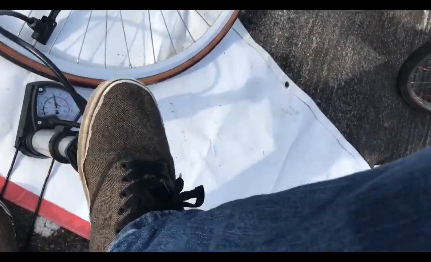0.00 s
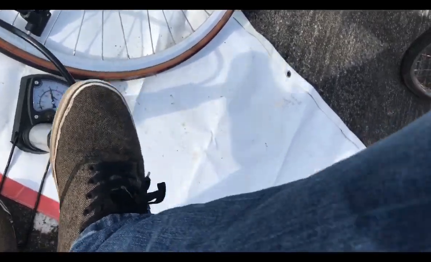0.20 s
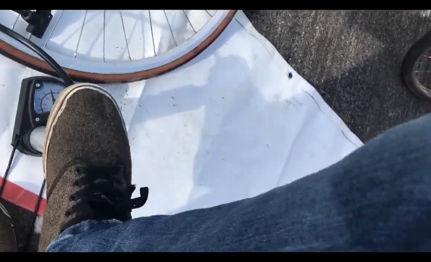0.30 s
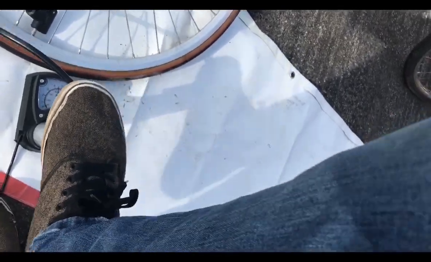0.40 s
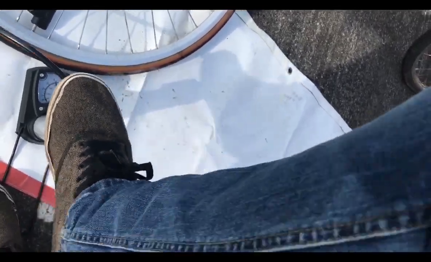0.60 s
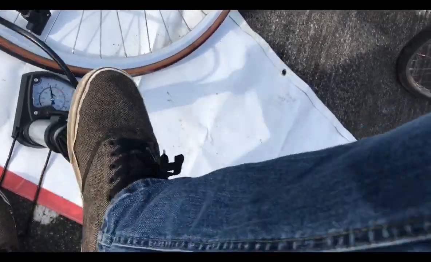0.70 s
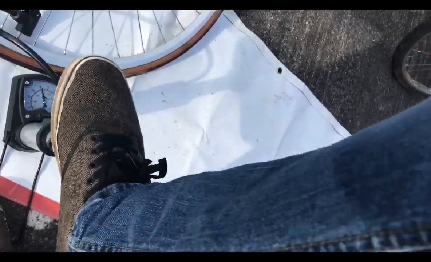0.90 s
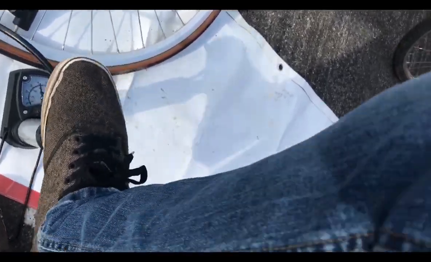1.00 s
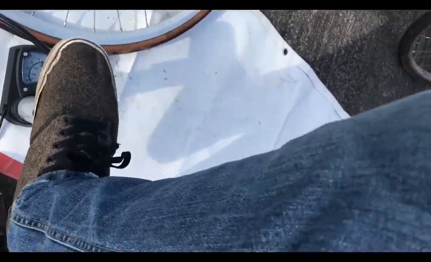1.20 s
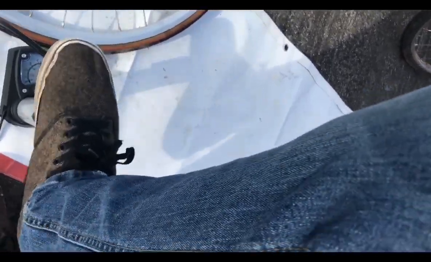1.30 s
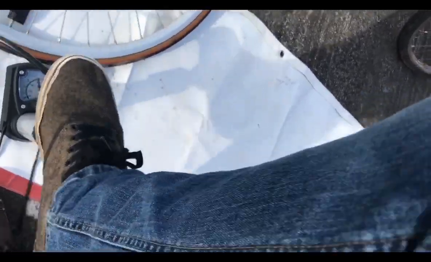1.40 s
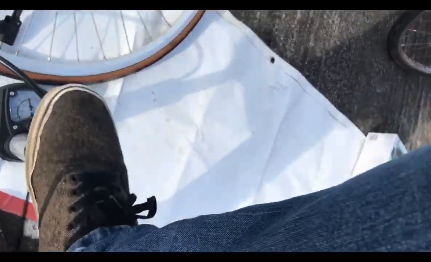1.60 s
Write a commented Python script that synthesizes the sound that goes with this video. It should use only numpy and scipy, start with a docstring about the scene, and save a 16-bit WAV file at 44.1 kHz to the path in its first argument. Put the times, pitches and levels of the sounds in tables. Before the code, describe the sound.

A foot-operated pump, close and dry outdoors, makes two strokes in about 1.7 seconds. Metal ticks and small knocks from 0.08 lead to a squeak and plastic knock at 0.36; a release knock at 0.54, soft thump, and air hiss peaking at 0.66. Ticks resume at 0.84, squeak at 1.08, loudest knock at 1.13, release at 1.33, hiss at 1.42, then faint ticks. Rubbing, wind rumble and quiet street continue underneath.

```python
"""Wind rumble and a quiet street are heard first, with faint air hiss and rubbing, as a foot pump is trodden twice.
Each stroke brings linkage ticks, a seal squeak, a knock at the bottom, a knock and thump on release, then air
hissing into the barrel. Knocks sum decaying body modes; ticks are noise bursts through linkage resonances;
thumps are short swelling sines; squeaks are wandering harmonic tones; hiss, rubbing, wind and street are
coloured noise, all but the street following a level curve in time."""
import sys
import numpy as np
from scipy import signal
from scipy.fft import rfft, irfft
from scipy.io import wavfile
from scipy.ndimage import uniform_filter1d

SR = 44100
rng = np.random.default_rng(int(sys.argv[2]) if len(sys.argv) > 2 else 0)


def generate_wav(signal):
    """Clip the signal to [-1, 1] and save it as 16-bit WAV at the path in sys.argv[1]."""
    frames = np.transpose(np.atleast_2d(signal))
    scaled = np.clip(frames, -1, 1) * 32767
    pcm = np.round(scaled).astype(np.int16)
    wavfile.write(sys.argv[1], SR, pcm)


def convert_level_to_amplitude(level_db):
    """Map a level in decibels to its linear amplitude factor."""
    exponent = np.asarray(level_db, float) / 20
    return 10 ** exponent


N = 74970  # samples, 1.7 s

# wind rumble on the microphone: time_s, level_db
WIND_LEVEL = [(0, -49.5), (.12, -60), (.26, -44.5), (.32, -53.5), (.43, -45.5), (.51, -53.5), (.67, -46.5),
              (.75, -63), (.82, -43.5), (.9, -46.5), (1.06, -59.5), (1.15, -43), (1.22, -56), (1.33, -47.5),
              (1.4, -46), (1.51, -55), (1.6, -53), (1.66, -47.5), (1.7, -46)]
# spectrum of the wind: frequency_hz, relative_density_db
WIND_SPECTRUM = [(15, -27), (25, -8), (45, -4), (65, 1), (100, -6.5), (160, -16.5), (300, -32.5),
                 (600, -75)]
# spectrum of the street: frequency_hz, relative_density_db
STREET_SPECTRUM = [(80, -23), (150, -8), (260, 1), (480, -16.5), (900, -3.5), (1600, -14), (3000, -26.5),
                   (6000, -32.5), (15800, -33)]
STREET_DB = -58.5
# air hiss at the valve: time_s, high_band_level_db, low_band_level_db
HISS_LEVEL = [(0, -65, -60), (.07, -71, -83), (.09, -60, -60.5), (.125, -54, -51), (.18, -67, -71.5),
              (.22, -63, -56), (.29, -63.5, -61.5), (.36, -49.5, -50), (.385, -60, -61), (.42, -77, -75.5),
              (.52, -64.5, -61.5), (.57, -58.5, -57), (.577, -55, -56), (.597, -56, -60), (.604, -62, -57),
              (.615, -54.5, -53), (.66, -41, -47), (.69, -46.5, -53), (.76, -71.5, -65.5), (.83, -73, -69),
              (.85, -56.5, -54.5), (.95, -60.5, -62), (1.01, -62.5, -59), (1.12, -54.5, -53),
              (1.15, -71, -66.5), (1.2, -71.5, -69.5), (1.24, -62.5, -66.5), (1.29, -70, -65),
              (1.35, -59, -59.5), (1.385, -53, -55), (1.415, -41.5, -49.5), (1.46, -47, -51),
              (1.495, -59, -60), (1.54, -83, -74), (1.59, -71, -66), (1.64, -55.5, -57.5),
              (1.7, -67, -61.5)]
# spectrum of the high hiss band: frequency_hz, relative_density_db
HISS_HIGH_SPECTRUM = [(6000, -43), (8200, -1.5), (10300, -4), (12000, 1.5), (14000, -1.5), (15400, 0.5),
                      (15850, -20)]
# spectrum of the low hiss band: frequency_hz, relative_density_db
HISS_LOW_SPECTRUM = [(1200, 0), (2000, 0), (3500, 0), (5000, -3.5), (6300, 0), (7500, -3), (9000, -21),
                     (12000, -68)]
HISS_PATCH_DB, HISS_PATCH_HZ = 2, 70.54  # spread and rate of each band's own swelling
# rubbing of shoe, cloth and piston: time_s, level_db
RUB_LEVEL = [(0, -59.5), (.07, -56.5), (.1, -50), (.2, -55), (.27, -55), (.33, -56), (.38, -50.5),
             (.42, -58), (.52, -59.5), (.56, -47.5), (.64, -52), (.76, -61.5), (.82, -66), (.85, -55.5),
             (.97, -52), (1.02, -59), (1.11, -47), (1.16, -46), (1.23, -57), (1.32, -60.5), (1.35, -49),
             (1.41, -52.5), (1.5, -59), (1.6, -55), (1.63, -46.5), (1.7, -60)]
# spectrum of the rubbing: frequency_hz, relative_density_db
RUB_SPECTRUM = [(150, 3), (300, -1), (500, -6.5), (850, -1.5), (1100, -5), (1500, -10.5), (2500, -17),
                (4000, -27.5), (8000, -68)]
RUB_GRAINS_PER_S, RUB_GRAIN_DB = 260, 3.5
# modes of the plastic pump body: frequency_hz, level_db, t60_s (before the ring factor of each knock)
BODY_MODES = [(339, 2, 0.025), (432, 1, 0.024), (513, 8, 0.016), (634, 4, 0.022), (798, 7, 0.019),
              (1032, 6, 0.011), (1072, 2, 0.017), (1302, -0.5, 0.02), (1646, -1.5, 0.019),
              (1970, -2.5, 0.033), (2320, 1.5, 0.015)]
# knocks on the body: start_s, peak_db (before the low cut), struck_pitch_hz, spread_octaves, ring_factor
KNOCK_EVENTS = [(.078, -30.5, 380, 1.36, 0.69), (0.1313, -34, 760, 0.45, 0.67),
                (.172, -30.5, 910, 0.87, 0.66), (0.2282, -23.5, 980, 0.98, .7), (.295, -46, 780, .5, 0.78),
                (0.3646, -21, 695, 0.9, 1.7), (.368, -17.5, 1065, 0.51, 1.43),
                (0.5432, -20, 1070, 0.92, 1.2), (0.616, -35, 1010, 0.26, 1.9),
                (.835, -34.5, 735, 1.22, 0.39), (.906, -41, 557, 0.63, 0.64),
                (0.969, -28.5, 676, 0.26, 0.71), (1.107, -25.5, 714, 1.7, 1.3),
                (1.1285, -12.5, 1140, 0.42, 1.1), (1.1298, -11.5, 432, 0.71, 0.49),
                (1.326, -16.5, 980, 0.9, 1.38), (1.394, -35, 930, 0.77, 1), (1.572, -43.5, 1520, 1.8, 0.45),
                (1.613, -38.5, 1100, 1.6, 0.87), (1.624, -35.5, 694, 0.5, 1.03),
                (1.652, -42.5, 850, 0.45, 1.6)]
KNOCK_RISE_S = 0.0018
KNOCK_LOW_CUT_HZ = 220  # removes the slow offset of the summed modes
# resonances of the metal linkage: frequency_hz, width_hz, level_db
LINKAGE_MODES = [(2450, 410, 4.5), (3280, 410, 4), (3940, 1480, 2.5), (4890, 1760, 3), (6300, 1580, -1),
                 (7700, 1200, -20), (8980, 2100, -4.5), (12250, 1600, -4), (15070, 740, 2)]
# ticks and clacks of the linkage: start_s, peak_db, rattle_t60_s, brightest_hz, fall_off_db_per_octave
TICK_EVENTS = [(.079, -34.5, 0.032, 3100, 20), (0.085, -42.5, 0.014, 3330, 19),
               (0.099, -38, 0.013, 2450, 21), (0.158, -37, 0.018, 11000, 3), (.171, -33, 0.048, 6000, 2.5),
               (0.1917, -31, 0.047, 6570, 4), (.2045, -29, 0.026, 7000, 8), (0.216, -33, 0.029, 7000, 4),
               (0.2281, -19.5, 0.025, 4240, 6), (0.365, -27.5, 0.033, 3100, 2),
               (0.5442, -27, 0.041, 2450, 6.5), (0.6139, -36.5, 0.013, 3830, 19),
               (.654, -33.5, 0.0058, 2500, 18), (0.781, -47.5, 0.013, 6900, 11),
               (0.833, -48.5, 0.033, 4500, 8), (0.836, -28.5, 0.028, 3220, 13.5),
               (0.9056, -34.5, 0.014, 8000, 3), (0.932, -34.5, 0.021, 6900, 15),
               (.9398, -40, 0.01, 7000, 10), (0.9507, -23.5, 0.032, 13000, 3), (1.106, -33, 0.028, 3000, 4),
               (1.1291, -22, 0.02, 2880, 2.5), (1.3276, -31.5, 0.027, 2850, 2.5),
               (1.394, -33, 0.01, 3000, -1), (1.530, -41.5, 0.029, 2980, 2),
               (1.572, -46.5, 0.019, 3400, 10), (1.613, -44, 0.018, 2900, 20),
               (1.687, -36, 0.0095, 6300, 7)]
SNAP_T60_S, RATTLE_DB = .008, -7  # first snap of a tick; rattle level relative to it
BELOW_STEEPER = 2.0  # factor on the fall-off under the brightest frequency
# soft thumps of the sole and frame: start_s, peak_db, frequency_hz, length_cycles
THUMP_EVENTS = [(.5985, -31, 108, 1.7), (0.56, -45, 46, 1.8), (.865, -31.5, 58, 1.6),
                (1.373, -26, 141, 1.38), (0.12, -51, 53, 1.5), (1.136, -41, 250, 0.52),
                (0.362, -37, 235, 3.5)]
# squeaks of the piston seal, one list each: time_s, pitch_hz, level_db
SQUEAK_TRACKS = [
    [(0.29, 812, -63), (0.297, 815.5, -55), (0.334, 934, -49), (0.346, 881, -34.5), (0.354, 879, -32),
     (0.372, 890, -38)],
    [(1.056, 860, -45), (1.068, 881, -47.5), (1.08, 860, -28), (1.104, 875, -36.5), (1.122, 930, -37.5),
     (1.128, 920, -48)],
]
# overtones of the squeak: frequency_multiple, level_db
SQUEAK_HARMONICS = [(1, 0), (2, -17), (3, -32), (4, -30)]
SQUEAK_FLUTTER_DB, SQUEAK_FLUTTER_HZ, SQUEAK_GRIT_DB = 1.8, 220, -15
SQUEAK_STEADY_DB = -42  # below this level the slip grows irregular
SQUEAK_WANDER = .07  # relative pitch spread at full irregularity
TOP_HZ, TOP_DROP_DB = 15800, 20


def curve(rows, col=1):
    """Linear interpolation: a table column joined by straight lines in time."""
    rows = np.array(rows)
    return np.interp(np.arange(N) / SR, rows[:, 0], rows[:, col])


def noise(colour):
    """Spectral shaping: white noise weighted by a (Hz, dB) density and scaled to unit rms."""
    hz, db = np.array(colour, float).T
    f = np.maximum(np.arange(N // 2 + 1) * SR / N, 1)
    gain = convert_level_to_amplitude(np.interp(np.log(f), np.log(hz), db, left=-60, right=-90))
    x = irfft(rfft(rng.standard_normal(N)) * gain, N)
    return x / x.std()


def walk(rate_hz):
    """Smoothed random modulation: levels held for 1 / rate and slewed twice, with unit spread."""
    k = int(SR / rate_hz)
    held = np.repeat(rng.standard_normal(N // k + 1), k)
    x = uniform_filter1d(uniform_filter1d(held, k), k)[:N]
    return x / x.std()


def fade(t, t60):
    """Exponential damping: a decay by 60 dB in t60 seconds."""
    return np.exp(-np.log(1000) * t / t60)


def add(out, start_s, sound, peak_db):
    """Superposition: a sound is normalised to its peak level and summed in at its start."""
    i = int(start_s * SR)
    n = min(len(sound), N - i)
    out[i:i + n] += sound[:n] * convert_level_to_amplitude(peak_db) / np.abs(sound).max()


def wind():
    """Turbulent pressure on a microphone: low noise whose level follows gusts and a slow random walk."""
    return noise(WIND_SPECTRUM) * convert_level_to_amplitude(curve(WIND_LEVEL) + 0.84 * walk(19.5))


def street():
    """Stationary background: coloured noise at a steady level."""
    return noise(STREET_SPECTRUM) * convert_level_to_amplitude(STREET_DB)


def patchy(x, count=14):
    """Independent band modulation: overlapping bands of a sound swell and sink each on their own."""
    spec, out = rfft(x), 0
    place = np.sqrt(np.arange(len(spec)) / len(spec)) * count  # bands widen with frequency
    for k in range(count + 1):
        band = irfft(spec * np.clip(1 - np.abs(place - k), 0, 1), N)
        out = out + band * convert_level_to_amplitude(HISS_PATCH_DB * walk(HISS_PATCH_HZ))
    return out


def hiss():
    """Jet noise: air through a narrow gap, two noise bands sharing one sputter, made patchy."""
    sputter_db = 0.55 * walk(60.4) + 1.54 * walk(430)
    high = noise(HISS_HIGH_SPECTRUM) * convert_level_to_amplitude(curve(HISS_LEVEL) + sputter_db)
    low = noise(HISS_LOW_SPECTRUM) * convert_level_to_amplitude(curve(HISS_LEVEL, col=2) + sputter_db)
    return patchy(high + low)


def rub():
    """Sliding friction: mid-range noise made grainy by rapid random level changes."""
    return noise(RUB_SPECTRUM) * convert_level_to_amplitude(curve(RUB_LEVEL) + RUB_GRAIN_DB * walk(RUB_GRAINS_PER_S))


def knocks():
    """Modal excitation: each blow rings most the body modes near its struck pitch."""
    out, t = np.zeros(N), np.arange(4096) / SR
    hz, db, t60 = np.array(BODY_MODES).T[:, :, None]
    for start_s, peak_db, struck_hz, spread, ring_factor in KNOCK_EVENTS:
        phase = rng.uniform(-.6, .6, (len(BODY_MODES), 1))
        share = np.exp(-(np.log2(hz / struck_hz) / max(spread, .2)) ** 2)
        modes = convert_level_to_amplitude(db) * share * np.sin(2 * np.pi * hz * t + phase) * fade(t, t60 * ring_factor)
        rise = 1 - np.exp(-(t / KNOCK_RISE_S) ** 2)
        add(out, start_s, modes.sum(axis=0) * rise, peak_db)
    low_cut = signal.butter(2, KNOCK_LOW_CUT_HZ, "high", fs=SR, output="sos")
    return signal.sosfilt(low_cut, out)


def ticks():
    """Resonant filtering: a dry snap and a short rattle of noise excite the linkage resonances."""
    out, t = np.zeros(N), np.arange(2048) / SR
    f = np.maximum(np.arange(2049) * SR / 4096, 1)
    ring = 0
    for k, (hz, width, db) in enumerate(LINKAGE_MODES):
        resonance = 1j * f * width / (hz ** 2 - f ** 2 + 1j * f * width)
        ring = ring + convert_level_to_amplitude(db) * resonance * (-1) ** k  # neighbours alternate in sign
    for start_s, peak_db, t60, brightest_hz, slope_db in TICK_EVENTS:
        rise = 1 - np.exp(-t / 0.00019)
        shape = (fade(t, SNAP_T60_S) + convert_level_to_amplitude(RATTLE_DB) * fade(t, max(t60, .003))) * rise
        octaves = np.log2(f / brightest_hz)
        distance = np.where(octaves < 0, -BELOW_STEEPER * octaves, octaves)
        tilt = convert_level_to_amplitude(-max(slope_db, 0) * distance)  # a negative slope counts as flat
        burst = rng.standard_normal(len(t)) * shape
        add(out, start_s, irfft(rfft(burst, 4096) * ring * tilt)[:len(t)], peak_db)
    return out


def thumps():
    """Heavily damped oscillation: a push and rebound, a low sine that swells and dies within a few cycles."""
    out = np.zeros(N)
    for start_s, peak_db, hz, cycles in THUMP_EVENTS:
        turn = np.arange(int(4 * cycles / hz * SR)) / SR * hz
        swell = turn * np.exp(-3.5 * turn / cycles)
        add(out, start_s, np.sin(2 * np.pi * turn) * swell, peak_db)
    return out


def squeaks():
    """Stick-slip of the seal: pitch wanders while faint and steadies when loud, under fluttering harmonics."""
    out, t = 0, np.arange(N) / SR
    for rows in SQUEAK_TRACKS:
        level_db = curve(rows, col=2)
        loose = np.clip((SQUEAK_STEADY_DB - level_db) / 8, .1, 1)  # irregularity of the slip
        pitch_hz = curve(rows) * (1 + SQUEAK_WANDER * loose * walk(250))
        phase = 2 * np.pi * np.cumsum(pitch_hz) / SR
        gate = np.clip(np.minimum(t - rows[0][0], rows[-1][0] - t) / 0.00065, 0, 1)
        tone = 0
        for k, db in SQUEAK_HARMONICS:
            flutter_db = (k + 2 * loose) * SQUEAK_FLUTTER_DB * walk(SQUEAK_FLUTTER_HZ)
            tone = tone + convert_level_to_amplitude(db + flutter_db) * np.sin(k * phase)
        grit = 1 + convert_level_to_amplitude(SQUEAK_GRIT_DB) * walk(900)
        out = out + np.sqrt(2) * tone * grit * gate * convert_level_to_amplitude(level_db)
    return out


def scene():
    """Free-field superposition: all sources summed, dry in the open air."""
    pump = knocks() + ticks() + thumps() + squeaks() + hiss() + rub()
    background = wind() + street()
    return (pump + background)[None]


def band_limit(x):
    """A steep low-pass at the top of the band."""
    return signal.sosfilt(signal.butter(12, 16970, fs=SR, output="sos"), x)


def record(dry):
    """Low-pass filtering: an elliptic filter turns down everything above about 15.8 kHz."""
    top_cut = signal.ellip(5, .3, TOP_DROP_DB, TOP_HZ, fs=SR, output="sos")  # 0.3 dB passband ripple
    mix = signal.sosfilt(top_cut, dry)
    return band_limit(mix)


dry = scene()
out = record(dry)
generate_wav(out)
```